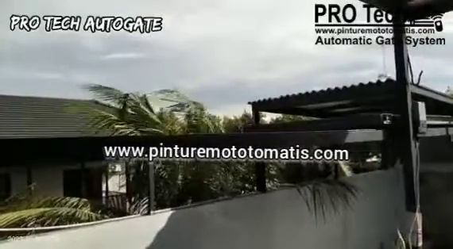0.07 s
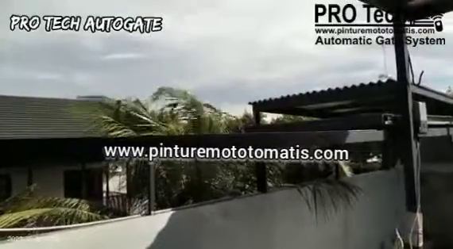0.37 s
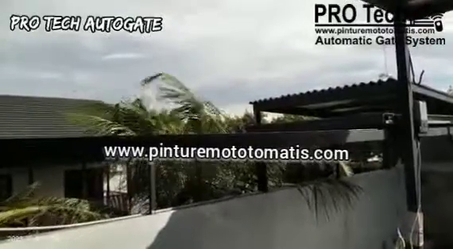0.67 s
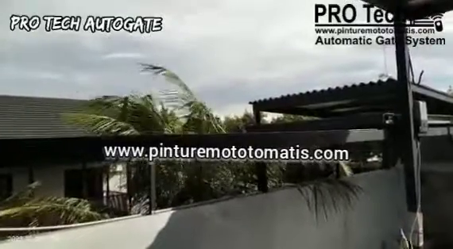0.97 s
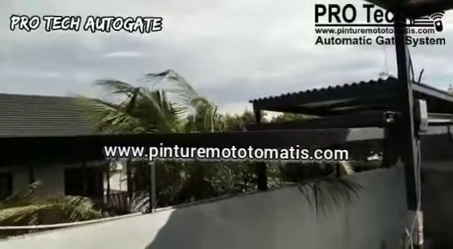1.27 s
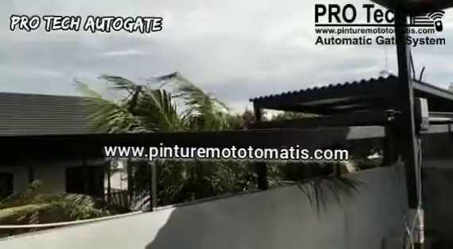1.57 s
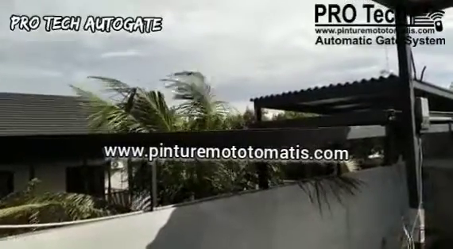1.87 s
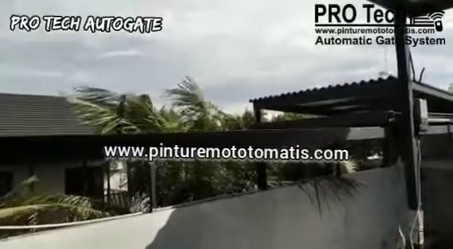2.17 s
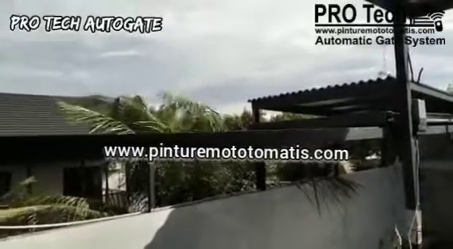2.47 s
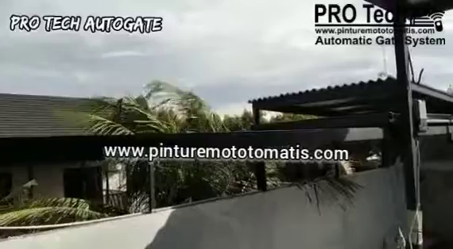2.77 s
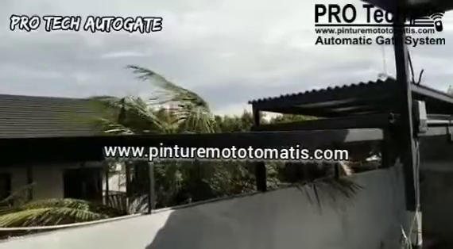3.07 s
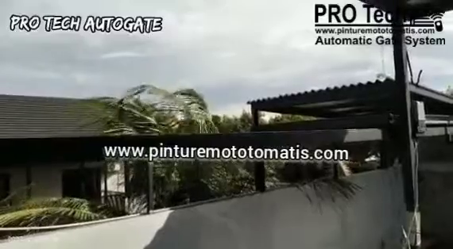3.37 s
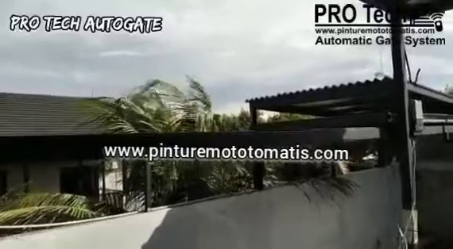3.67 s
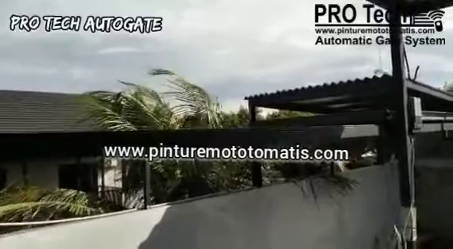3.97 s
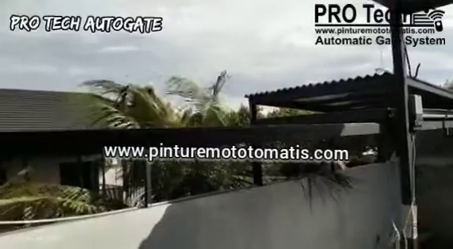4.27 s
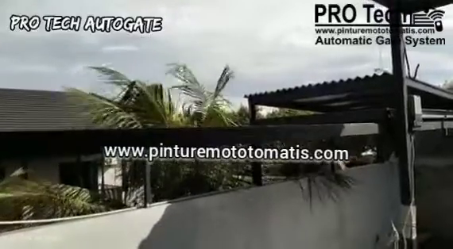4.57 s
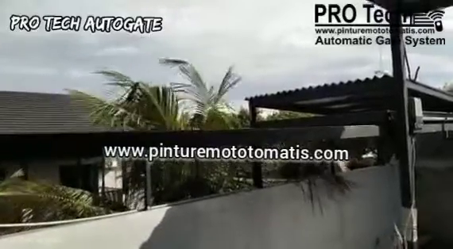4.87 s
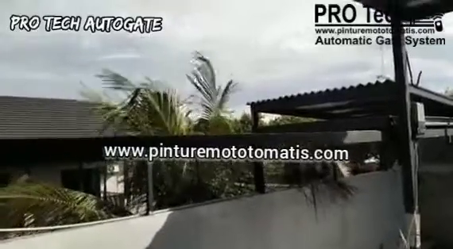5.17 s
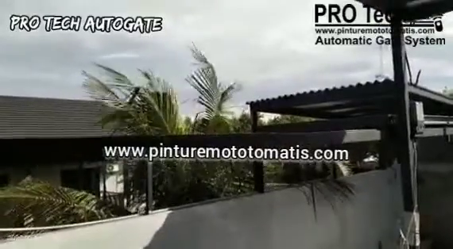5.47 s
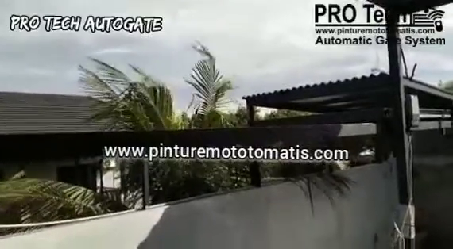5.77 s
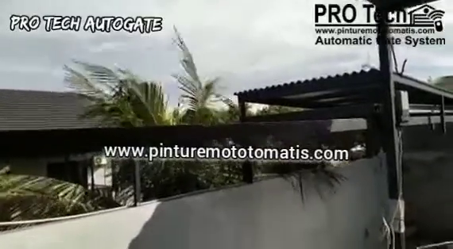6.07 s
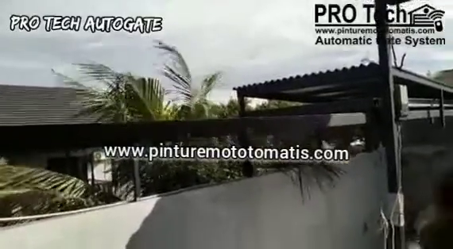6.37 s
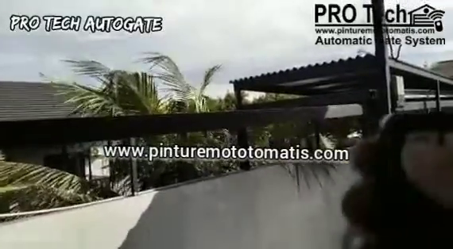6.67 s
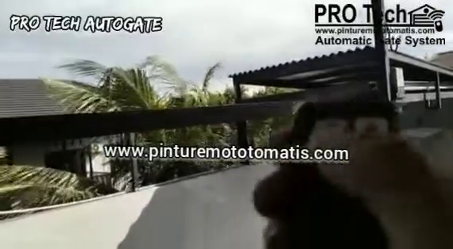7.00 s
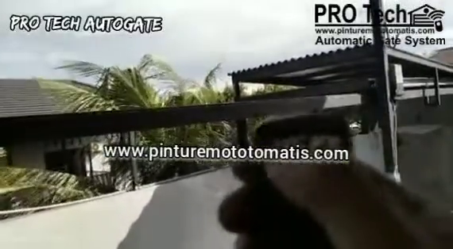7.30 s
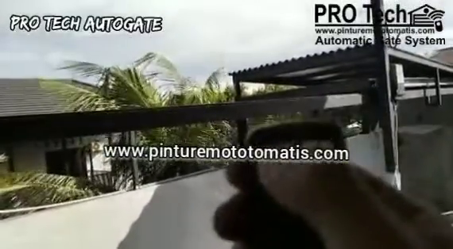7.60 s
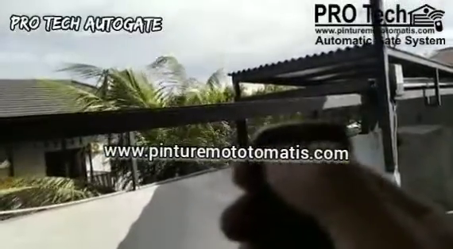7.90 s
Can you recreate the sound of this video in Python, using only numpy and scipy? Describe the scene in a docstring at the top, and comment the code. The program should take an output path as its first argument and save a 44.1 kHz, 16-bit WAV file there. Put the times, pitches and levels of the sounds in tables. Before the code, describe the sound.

Palm leaves hiss in the wind over faint distant traffic, while gusts rumble and thump against the microphone.

```python
"""Gusty wind in a yard with palms. From the start, fronds hiss and rustle over far trees and traffic, while
eddies buffet the microphone with a rumble that brightens as it grows. The trees swell twice, the second
time with a thin whistle near 2.4 s. A distant engine hums faintly, crests at 3.6 s and fades. Leaflets
snap at 5 s; at 5.5 s the big gust hits with slaps and sputter, then dies away in puffs by 8 s."""
import sys
import numpy as np
from scipy import signal
from scipy.fft import rfft, irfft
from scipy.io import wavfile
from scipy.ndimage import uniform_filter1d, minimum_filter1d, map_coordinates

SR = 44100
rng = np.random.default_rng(int(sys.argv[2]) if len(sys.argv) > 2 else 0)


def wav_record(signal):
    """Record a signal, one row per channel, as 16-bit PCM in the file named by sys.argv[1]."""
    frames = np.transpose(np.atleast_2d(signal))
    bounded = np.clip(frames, -1, 1)
    # unit amplitude maps onto the largest positive 16-bit level
    quanta = np.round(bounded * 32767).astype(np.int16)
    wavfile.write(sys.argv[1], SR, quanta)


N = 358974
TIME = np.arange(N) / SR
FREQ = np.fft.rfftfreq(N, 1 / SR)
GUST_DB = -15  # reference wind strength, about that of the big gust

# Levels are relative: the layers add their own trims. An EQ sets tone colour only.
# fader ride of the far traffic: t/s, level/dB
TRAFFIC_RIDE = [(0, -44), (1, -46), (2.3, -42.5), (4.8, -47), (5.3, -54.5), (8.14, -56.5)]
# low drone of the traffic: f/Hz, level/dB
TRAFFIC_EQ = [(20, -4), (65, -3), (140, 5.5), (230, -2), (320, 1.5), (380, -4), (450, -1.5), (540, -2.5),
              (620, -6), (720, -17.5), (1500, -34), (5000, -93)]
# fader ride of the distant engine: t/s, level/dB
ENGINE_RIDE = [(0, -45.5), (2.8, -41.5), (3.6, -39), (4.4, -42.5), (6, -66), (8.14, -68)]
# tones of its hum: f/Hz, level/dB
ENGINE_TONES = [(33.4, -0.5), (134, -11.5), (520, -20.5), (610, -22)]
# wind in the farther trees: t/s, level/dB
TREE_RIDE = [(0, -50), (1.15, -50), (1.42, -45), (1.85, -51), (2.3, -43.5), (2.75, -51.5), (4.95, -50),
             (5.8, -55), (6.5, -59), (8.14, -57)]
# their dull roar: f/Hz, level/dB
TREE_EQ = [(200, 4.5), (450, -12), (750, 0.5), (1000, 0), (1250, 0), (1600, 0.5), (1900, -2.5), (2300, -14),
           (3500, -13), (8000, -62)]
# wind in the palms: t/s, frond rustle level/dB, tip fizz level/dB
PALM_RIDE = [(0.0, -52.5, -56), (0.09, -52.5, -57.5), (0.22, -50, -50), (0.65, -51.5, -56.5),
             (0.72, -49.5, -51.5), (1.27, -50.5, -55.5), (2.86, -49.5, -53.5), (2.92, -52.5, -56),
             (3.6, -52.5, -56.5), (3.97, -53.5, -63), (4.03, -51, -59), (5.12, -51.5, -56),
             (5.28, -56, -62.5), (5.8, -54, -58.5), (6.39, -60, -65), (7.07, -59, -64.5),
             (7.12, -56, -59.5), (8.14, -57, -60)]
# hiss of rubbing leaflets: f/Hz, level/dB
LEAF_EQ = [(1120, -22), (1900, -12), (2210, -8.5), (2930, -4), (3730, -5), (4220, -2), (4990, -6.5),
           (6230, -5.5), (7780, -11.5), (8500, -10), (10700, -13.5), (11700, -12), (13000, -15),
           (16000, -18.5)]
# a frond is tossed and surges, or falls slack: t/s, half length/s, lift/dB
FROND_TOSSES = [(0.39, 0.045, 2), (.48, .03, -3.5), (0.933, 0.24, 3.5), (1.402, 0.053, 4), (1.585, .04, 2),
                (1.683, .04, -3.5), (1.877, 0.072, 2), (2.199, 0.12, 2.5), (2.73, 0.056, 2.5),
                (3.216, 0.043, 3), (3.82, .07, -2), (4.815, 0.064, 2), (6.047, 0.019, 3), (6.74, .04, 3.5),
                (7.021, .04, -4.5), (7.147, 0.034, 2), (7.55, .1, 0), (7.72, 0.052, -4), (7.9, .1, 2)]
# brief swishes and rasps of a frond: t/s, level/dB, f/Hz, width/Hz, half length/s
FROND_SWISHES = [(.37, -44.5, 1060, 330, 0.037), (4.73, -46, 970, 700, .062),
                 (4.75, -46.5, 475, 250, 0.077), (2.55, -43, 510, 71, 0.039),
                 (3.428, -46.5, 4090, 1190, .005), (4.64, -48, 3630, 700, .007),
                 (4.792, -45.5, 4200, 600, .006), (5.303, -47, 4160, 2200, .0024),
                 (5.727, -47, 4100, 900, .01)]
# bands of a thin whistle: t/s, level/dB, f/Hz, width/Hz, half length/s
WHISTLE_BANDS = [(2.45, -54.5, 3100, 120, .07), (2.38, -56, 5350, 260, .06), (2.41, -61.5, 8400, 130, .1)]
# dry snaps of leaflets: t/s, level/dB
LEAF_TICKS = [(5.0119, -23.5), (5.016, -30), (5.735, -36), (6.2756, -39)]
# their bright click: f/Hz, level/dB
TICK_EQ = [(300, -29), (1500, 8), (3000, 5), (4300, 14), (6000, 4), (13000, 2), (16000, -14)]
# steady wind on the microphone, between puffs: t/s, level/dB
BREEZE_RIDE = [(0, -45), (.3, -32), (.62, -29), (1.2, -42), (1.7, -48), (2.25, -43), (2.7, -58),
               (3.1, -39.5), (3.85, -60.5), (4.9, -58.5), (5.44, -36), (5.51, -16), (6.26, -16), (6.4, -25),
               (6.92, -34), (7.4, -36.5), (7.6, -49.5), (8.14, -64.5)]
# puffs on top of it: crest t/s, half length/s, flutter level/dB, swing level/dB
WIND_PUFFS = [(0.099, 0.023, -18, -15), (.18, .02, -28.5, -27), (.36, 0.036, -21, -17),
              (.51, 0.047, -19, -23), (0.749, .025, -29, -20.5), (1.085, 0.019, -29, -24),
              (1.555, 0.018, -40, -28), (1.851, 0.031, -30, -25), (2.097, 0.073, -31, -32),
              (2.412, 0.033, -17, -16), (2.542, 0.024, -31, -21), (2.85, .02, -28, -25),
              (2.93, 0.04017, -20, -22), (2.979, 0.028, -26, -15.5), (3.101, 0.027, -31, -24),
              (3.367, .03, -52, -31.5), (5.022, 0.028, -31, -23), (5.209, 0.049, -40, -28),
              (5.296, 0.024, -17, -20), (5.391, 0.0296, -20, -13.5), (5.525, 0.031, -11, -18),
              (5.676, .035, -17, -12.5), (5.91, 0.032, -12, -11.5), (6.045, 0.0402, -16, -15.5),
              (6.125, .018, -22.5, -13), (6.288, .035, -12, -7.5), (6.434, 0.026, -22.5, -24),
              (6.492, 0.021, -20.5, -11), (6.588, 0.037, -14, -14.5), (6.666, .025, -14.5, -17),
              (6.809, 0.041, -19, -20), (7.046, 0.084, -30, -26.5), (7.255, .03, -18.5, -20),
              (7.355, .03, -28.5, -23.5), (7.473, 0.032, -31.5, -27), (7.831, 0.046, -48, -41)]
# fast flutter of turbulence at full wind speed: f/Hz, level/dB
FLUTTER_EQ = [(40, -39), (85, -17), (125, 4), (175, -1.5), (235, -6), (330, -15), (450, -26.5),
              (650, -43.5), (1000, -66), (4000, -110)]
# slow, deep pressure swings: f/Hz, level/dB
SWING_EQ = [(5, -18.5), (18, -5), (27, -9.5), (37, -0.5), (52, -2.5), (75, -4.5), (105, -7.5), (150, -17.5),
            (300, -54), (800, -110)]
# sputter of the finest eddies: f/Hz, level/dB
SPUTTER_EQ = [(150, -29), (300, 2.5), (410, 5.5), (520, -6), (720, -11), (900, -20), (1200, -31),
              (1800, -42), (5000, -100)]
# hard eddies slapping the microphone: t/s, edge level/dB, thump level/dB, wake level/dB
EDDY_SLAPS = [(.0865, -28, -7.5, -42), (.335, -43, -12, -48), (0.483, -29, -8.5, -42), (.513, -41, -8, -48),
              (2.42, -38, -20, -44), (2.933, -31, -28, -44), (5.494, -18.5, -4.5, -24),
              (5.563, -22, -8, -28.5), (5.635, -11.5, -8, -20), (5.79, -33, -18, -35),
              (5.878, -27, -15, -31), (5.941, -25, -16, -26), (6.02, -29, -15, -30),
              (6.0698, -13, -3, -14.5), (6.154, -33, -12.5, -25), (6.207, -25.5, -14, -31),
              (6.233, -25, -8, -19.5), (6.275, -20, -6, -17), (6.301, -25, -10, -28),
              (6.336, -27, -13, -30), (6.437, -33, -13, -31), (6.586, -28, -5.5, -19),
              (6.664, -34, -7, -28), (6.778, -31, -11, -24), (7.238, -42, -16, -42)]


def gain_of(db):
    """Decibels to amplitude."""
    return 10 ** (np.asarray(db) / 20)


def unit_rms(x):
    """Scales to rms 1."""
    return x / np.sqrt(np.mean(x ** 2) + 1e-20)


def eq_db(points):
    """An EQ curve in dB at every frequency, drawn on a log axis."""
    hz, db = np.transpose(points)
    return np.interp(np.log(FREQ + 1), np.log(hz + 1), db)


def rides(rows):
    """Each level column of a time table, at every sample."""
    s, *columns = np.transpose(rows)
    return [np.interp(TIME, s, column) for column in columns]


def bell(s, half_length):
    """A smooth rise and fall about the moment s."""
    return np.exp(-((TIME - s) / half_length) ** 2)


def noise(gain):
    """Noise of rms 1, coloured by a gain at each frequency."""
    return unit_rms(irfft(rfft(rng.standard_normal(N)) * gain, N))


def wander(hz):
    """A smooth random modulator, moving up to about hz times a second."""
    return noise(1 / (1 + (FREQ / hz) ** 4))


def steadied(x, seconds):
    """Evens out the slow swells of a noise, so that the wind alone sets its strength."""
    window = signal.windows.hann(int(seconds * SR))
    power = signal.fftconvolve(x ** 2, window / window.sum(), "same")
    return x / np.sqrt(abs(power) + 1e-6)


def traffic(drone_db=-1, pitch_waver=0.00925, tremble_db=1.1):
    """A low bed of far traffic, and the wavering hum of one engine."""
    drone = gain_of(rides(TRAFFIC_RIDE)[0] + drone_db) * noise(gain_of(eq_db(TRAFFIC_EQ)))
    engine_time = np.cumsum(1 + pitch_waver * wander(6.03)) / SR
    hum = sum(gain_of(db + tremble_db * wander(5.6)) * np.sin(2 * np.pi * hz * engine_time)
              for hz, db in ENGINE_TONES)
    return drone + np.sqrt(2) * gain_of(rides(ENGINE_RIDE)[0]) * hum


def trees(trim_db=-1.5, flicker_db=1.42):
    """Farther foliage merges into a dull roar."""
    level_db = rides(TREE_RIDE)[0] + trim_db + flicker_db * wander(31)
    return gain_of(level_db) * noise(gain_of(eq_db(TREE_EQ)))


def leaflets(colour, patchy_db, flicker_db, patter_db, strikes_per_s, scrape_s=0.00021):
    """Leaflets rub in drifting patches of hiss and strike each other in a dense patter."""
    hits = rng.random(N) < strikes_per_s / SR
    strikes = hits * gain_of(1.8 * np.minimum(rng.exponential(1, N), 4))
    scrapes = signal.lfilter([1], [1, -np.exp(-1 / (scrape_s * SR))], strikes)  # a short tail on each
    patter = unit_rms(scrapes * rng.standard_normal(N))
    spectrogram = signal.stft(rng.standard_normal(N) + gain_of(patter_db) * patter, nperseg=512)[2]
    patches = uniform_filter1d(rng.standard_normal(spectrogram.shape), size=4, axis=0)  # blur in pitch
    patches = unit_rms(uniform_filter1d(patches, size=9, axis=1))  # and in time
    rub = signal.istft(spectrogram * gain_of(patchy_db * patches), nperseg=512)[1][:N]
    rub *= gain_of(flicker_db * wander(50))
    return unit_rms(irfft(rfft(rub) * colour, N))


def palms(rustle_db=-0.28, fizz_db=1.0, frond_share=0.74, sway_db=1.1, crossover_hz=6600):
    """Fronds rustle with a papery ring; their whipping tips fizz higher up and feel each toss more."""
    frond_db, tip_db = rides(PALM_RIDE)
    toss_db = sum(lift_db * bell(s, half_length) for s, half_length, lift_db in FROND_TOSSES)
    toss_db += sway_db * wander(5)
    ring_db = 2 * np.exp(-((FREQ - 4250) / 260) ** 2)
    leaf = gain_of(eq_db(LEAF_EQ) + ring_db)
    low_share = 1 / (1 + (FREQ / crossover_hz) ** 8)
    lows, highs = leaf * np.sqrt(low_share), leaf * np.sqrt(1 - low_share)
    rustle = leaflets(lows, patchy_db=1.26, flicker_db=0.08, patter_db=-13, strikes_per_s=370)
    fizz = leaflets(highs, patchy_db=1.0, flicker_db=-0.05, patter_db=-8, strikes_per_s=520)
    return (gain_of(frond_db + rustle_db + frond_share * toss_db) * rustle
            + gain_of(tip_db + fizz_db + toss_db) * fizz)


def swells(rows):
    """Swishes and whistles: each band of noise is a resonance that swells and fades."""
    return sum(gain_of(db) * bell(s, half_length) * noise(1 / (1 + ((FREQ - hz) / width * 2) ** 2))
               for s, db, hz, width, half_length in rows)


def ticks(trim_db=-6, decay_s=0.001):
    """Stiff leaflets snap against each other."""
    bursts = sum(gain_of(db) * (TIME >= s) * np.exp(-abs(TIME - s) / decay_s) for s, db in LEAF_TICKS)
    return gain_of(trim_db) * bursts * noise(gain_of(eq_db(TICK_EQ)))


def ducking(wind_db, dip_db=3.0, dip_hz=65, calm_db=-36, range_db=14):
    """A gain for the palms: they flutter with brief dips while wind beats on the microphone."""
    windy = np.clip((wind_db - calm_db) / range_db, 0, 1)
    dips = np.clip(wander(dip_hz), 0, 1.7) ** 2
    return gain_of(-dip_db * windy * (dips - dips.mean() / 2))


def wind_strength(gust_swing_db=-16, swing_slope=0.73):
    """Puffs add their power to the breeze: dB of the slow pressure swings and of the fast flutter."""
    breeze_db = rides(BREEZE_RIDE)[0]
    # a slope under 1 lets the swings outlast the flutter in a lull
    swing_power = gain_of(gust_swing_db + swing_slope * (breeze_db - GUST_DB)) ** 2
    flutter_power = gain_of(breeze_db) ** 2
    for s, half_length, flutter_db, swing_db in WIND_PUFFS:
        puff = bell(s, half_length)
        swing_power += (gain_of(swing_db) * puff) ** 2
        flutter_power += (gain_of(flutter_db) * puff) ** 2
    return 10 * np.log10(swing_power), 10 * np.log10(flutter_power)


def sputter(flutter_db, gust_level_db=-36, steepness=1.78, rise_s=0.0078, fall_s=0.019, burst_db=4):
    """The finest eddies come in bursts of a few milliseconds, in strong wind and in each slap's wake."""
    power = gain_of(gust_level_db + steepness * (flutter_db - GUST_DB)) ** 2
    for s, _, _, wake_db in EDDY_SLAPS:
        wake = np.exp(-np.maximum((s - TIME) / rise_s, (TIME - s) / fall_s).clip(max=20))
        power += (gain_of(wake_db) * wake) ** 2
    bursts = noise(gain_of(eq_db(SPUTTER_EQ))) * gain_of(burst_db * wander(80))
    return np.sqrt(power) * steadied(bursts, 0.097)


def slaps(sharpening=0.23, edge_cycles=0.35, thump_hz=195, thump_cycles=0.52):
    """A small hard eddy gives one quick push and pull of pressure; a harder hit has a sharper edge."""
    out = np.zeros(N)
    t = np.arange(-500, 500) / SR
    for s, edge_db, thump_db, _ in EDDY_SLAPS:
        edge_hz = 620 * gain_of(sharpening * (edge_db + 17.5))
        start = round((s + t[0]) * SR)
        for db, hz, cycles in (edge_db, edge_hz, edge_cycles), (thump_db, thump_hz, thump_cycles):
            envelope = gain_of(db) * np.exp(-(t * hz / cycles) ** 2)
            out[start:start + len(t)] += envelope * np.cos(2 * np.pi * hz * t)
    return out


def buffet(swing_db, flutter_db, trim_db=-0.08, full_speed_db=-12, quickening=.2, lump_db=4.5, surge=.12):
    """Frozen eddies blow past the microphone, louder and faster in stronger wind, over deep swings."""
    lumps = wander(55)  # roughens both speed and level
    lull_db = np.clip(flutter_db - full_speed_db, -20, 0)
    speed = gain_of(quickening * lull_db) * np.exp(surge * lumps)
    eddies = noise(gain_of(eq_db(FLUTTER_EQ)))
    playhead = np.cumsum(speed) % (N - 1)
    flutter = map_coordinates(eddies, [playhead], order=3) * gain_of(lump_db * lumps)
    swings = noise(gain_of(eq_db(SWING_EQ)))
    return (gain_of(flutter_db + trim_db) * steadied(flutter, 0.087)
            + gain_of(swing_db) * steadied(swings, 0.11))


def scene():
    """The mono mix: traffic far back, foliage all around, wind right on the microphone."""
    swing_db, flutter_db = wind_strength()
    wind = buffet(swing_db, flutter_db) + sputter(flutter_db) + slaps()
    foliage = palms() * ducking(swing_db) + trees()
    accents = swells(FROND_SWISHES) + swells(WHISTLE_BANDS) + ticks()
    return (traffic() + foliage + accents + wind)[None]


def record(dry, cutoff_hz=15750):
    """A limiter holds the hardest gusts to full scale; a steep low-pass trims the top."""
    safe_gain = minimum_filter1d(1 / np.maximum(abs(dry[0]), 1), size=301)
    limited = dry * uniform_filter1d(uniform_filter1d(safe_gain, size=151), size=151)
    lowpass = signal.firwin(511, cutoff_hz, window=("kaiser", 9), fs=SR)
    return signal.oaconvolve(limited, lowpass[None], "same")


dry = scene()
out = record(dry)
wav_record(out)
```